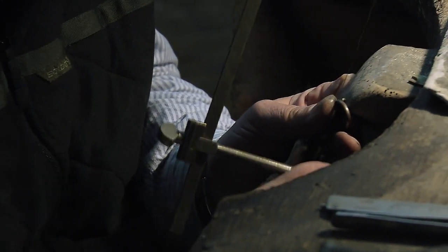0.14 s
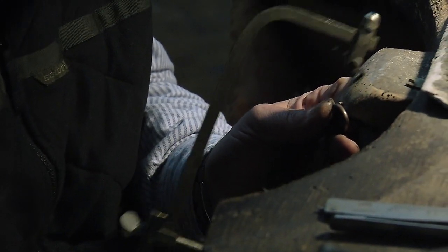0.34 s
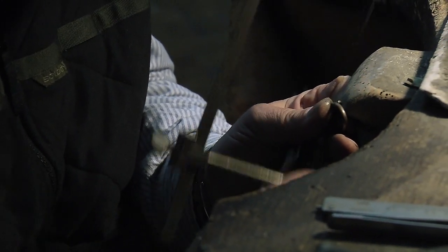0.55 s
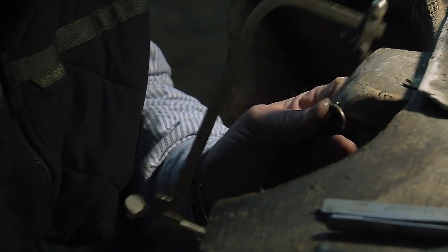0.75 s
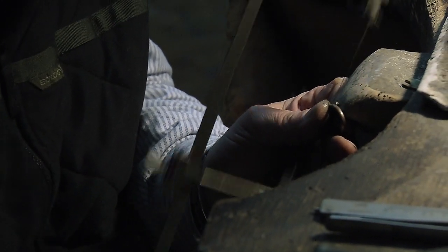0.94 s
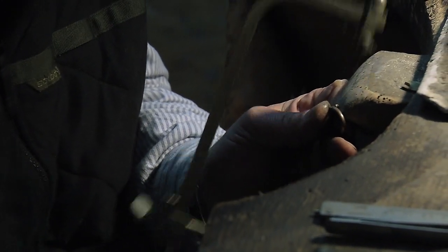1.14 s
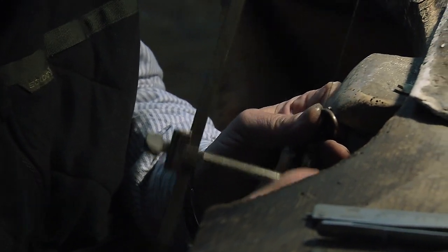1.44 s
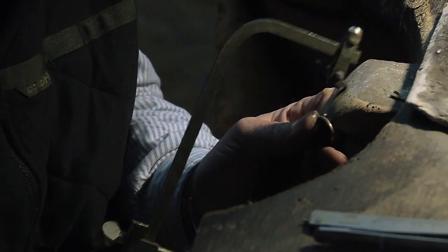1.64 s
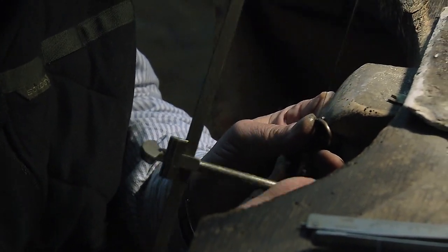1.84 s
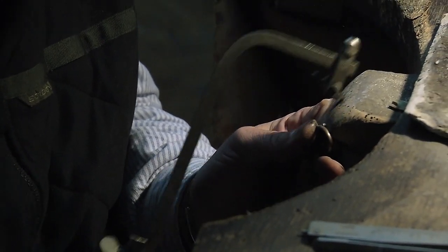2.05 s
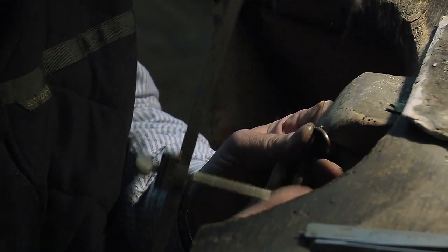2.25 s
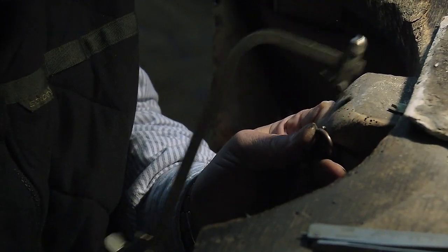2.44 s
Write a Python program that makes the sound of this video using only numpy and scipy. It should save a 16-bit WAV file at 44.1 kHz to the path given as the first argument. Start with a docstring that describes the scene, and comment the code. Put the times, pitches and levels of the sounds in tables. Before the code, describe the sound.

Fine-toothed hand saw rasping back and forth through a small metal ring, with brief squeaks, close up

```python
"""Small quiet workshop, close up: a piercing saw cuts a metal ring on a wooden bench pin, six double strokes.
Uneven tooth ticks and filing noise drive ring, frame, bench and blade modes; cuts are longer and deeper than returns.
Snagging teeth are decaying noise bursts; evenly biting teeth are short rough tones with an octave.
The binding blade squeaks in near-pure tones, the shortening blade chirps upward, single ring modes flare up.
A faint room answer and a steady shaped-noise floor lie behind."""
import sys
import numpy as np
from scipy import signal
from scipy.fft import rfft, irfft, next_fast_len
from scipy.io import wavfile
from scipy.ndimage import uniform_filter1d, map_coordinates

SR = 44100
rng = np.random.default_rng(int(sys.argv[2]) if len(sys.argv) > 2 else 0)


def inscribe(sig):
    """Save sig as 16-bit PCM at rate SR to the path in sys.argv[1].

    A 1-D sig is mono; a 2-D sig holds one channel per row.
    Samples are clipped to [-1, 1] before scaling.
    """
    pcm = np.round(np.clip(np.atleast_2d(sig).T, -1, 1) * 32767)
    wavfile.write(sys.argv[1], SR, pcm.astype(np.int16))


N = 114660

# modes of each body: (frequency [Hz], width [Hz], relative level on the return [dB], on the cut [dB])
RING_MODES = [(4185, 215, -16, -19.5), (4460, 154, -14, -14), (4774, 370, -16.5, -13.5),
              (5380, 373, -9, -9), (5964, 220, 4, 1.5), (6176, 271, 2, 1), (6600, 377, -4.5, -3.5),
              (7550, 340, -11.5, -6.5), (7884, 396, -12, -6)]
FRAME_MODES = [(663, 53, -8.5, -4), (823, 49, -15.5, -3.5), (878, 23, -13, -2.5), (1050, 119, -4.5, 4.5),
               (1074.5, 64.7, -12, 8.5), (1140, 78, -9.5, -2), (1372, 114, -6, -4.5), (1523, 70, -6, -3.5),
               (1928, 111, -9, -4.5), (2187, 74, -15.5, -10), (2491, 136, -11.5, -8.5),
               (2739, 280, -15.5, -14.5), (3590, 620, -38, -25)]
BENCH_MODES = [(108.4, 24, -10.5, -14.5), (197.3, 21.5, -17, -4), (246, 41.5, 9.9, 0.27),
               (292.3, 47, 2.5, -1.5), (439, 52, -18, -11), (523, 52.4, 0, -6)]
BLADE_MODES = [(9100, 240, 3, -15), (10340, 320, 1, 6.5), (10330, 340, -4, -1.5), (11810, 700, 3, 5.5),
               (13400, 900, -15, -4.5), (14100, 820, -14, -15), (15100, 280, -11, -6), (15500, 700, -9, -4)]
RETURN_COLUMN, CUT_COLUMN = 2, 3


def amp(db):
    """Amplitude factor of a level in dB."""
    return 10 ** (np.asarray(db) / 20)


def unit(x):
    """x scaled to rms 1."""
    return x / np.sqrt(np.mean(x ** 2) + 1e-20)


def along(points, hz):
    """(Hz, value) points interpolated on a log frequency axis."""
    point_hz, value = np.transpose(points)
    return np.interp(np.log(hz + 1), np.log(point_hz + 1), value)


def wobble(knots_per_s):
    """Smooth random curve through normally distributed knots."""
    knots = rng.standard_normal(int(N * knots_per_s / SR) + 4)
    return map_coordinates(knots, [np.arange(N) * knots_per_s / SR])


def filtered(x, response):
    """x times a complex response of frequency, zero-padded."""
    m = next_fast_len(N + SR // 2)
    return irfft(rfft(x, m) * response(np.fft.rfftfreq(m, 1 / SR)), m)[..., :N]


def body(modes, column):
    """Response of parallel resonances of alternating sign, rms gain 1 for white noise."""
    def response(f):
        h = 0
        for k, mode in enumerate(modes):
            mode_hz, width_hz = mode[:2]
            damping = 1j * f * width_hz
            h = h + (-1) ** k * amp(mode[column]) * damping / (mode_hz ** 2 - f * f + damping)
        return h / np.sqrt(np.mean(np.abs(h) ** 2))
    return response


def swell(u, peak, sharp):
    """Bump from 0 at u = 0 through 1 at the peak to 0 at u = 1."""
    u = np.clip(u, 0, 1)
    rise = (u / peak) ** peak
    fall = ((1 - u) / (1 - peak)) ** (1 - peak)
    return (rise * fall) ** (2 * sharp)


def teeth(teeth_per_s):
    """One tick per tooth, uneven in time and size, over filing noise."""
    jitter_teeth, scatter_db, grit_power_share = .35, 3, .68
    marks = np.flatnonzero(np.diff(np.floor(np.cumsum(teeth_per_s) / SR)))
    draw = rng.standard_normal((N, 2))[marks]
    late = jitter_teeth * draw[:, 0] * SR / teeth_per_s[marks]
    at = np.clip(np.round(marks + late), 0, N - 1).astype(int)
    size = amp(scatter_db * draw[:, 1])
    ticks = np.bincount(at, size, N) - size.mean() * teeth_per_s / SR  # mean removed
    ticks = ticks / np.std(ticks[teeth_per_s > 1])
    grit = rng.standard_normal(N)
    return np.sqrt(1 - grit_power_share) * ticks + np.sqrt(grit_power_share) * grit


def patchy(x, depth_db):
    """Random gain over time and frequency: resonances take turns as the contact point moves."""
    z = signal.stft(x, nperseg=512)[2]
    # patches of about 350 Hz by 30 ms, fading out in the bass
    field = uniform_filter1d(rng.standard_normal(z.shape), size=4, axis=0)
    field = uniform_filter1d(field, size=5, axis=1)
    field = np.clip(np.arange(len(z)) / 8, 0, 1)[:, None] * field
    gain = amp(depth_db * unit(field))
    return signal.istft(z * unit(gain), nperseg=512)[1][:N]


def strokes(rows, swells, column):
    """All strokes of one direction: the same teeth drive ring, frame, bench pin and blade."""
    # uneven bite: (knots per second [1/s], depth [dB])
    chatter = [(35, 2), (140, 1.5)]
    # depth factor of the bite for ring, frame, bench, blade: [1]
    chatter_share = [0.62, 0.53, 0.18, .6]
    slowing = .25  # share by which the tooth rate sags at the stroke ends
    patch_depth_db = 2.5
    t = np.arange(N) / SR

    teeth_per_s = np.full(N, 1e-3)
    for start_s, length_s, peak, top_rate, *_ in rows:
        inside = (t >= start_s) * (t < start_s + length_s)
        sag = slowing * (1 - swell((t - start_s) / length_s, peak, .99))
        teeth_per_s = teeth_per_s + inside * top_rate * (1 - sag)
    drive = teeth(teeth_per_s)

    shared_db = sum(db * wobble(rate) for rate, db in chatter)
    out = 0
    bodies = (RING_MODES, FRAME_MODES, BENCH_MODES, BLADE_MODES)
    for k, (modes, (sharp, later)) in enumerate(zip(bodies, swells)):
        force = 0
        for start_s, length_s, peak, _, peaked, *level_db in rows:
            u = (t - start_s) / length_s
            force = force + amp(level_db[k]) * swell(u, peak + later, sharp * peaked)
        own_db = sum(db * wobble(rate) for rate, db in chatter)
        bite = amp(chatter_share[k] * (shared_db + own_db))
        out = out + filtered(drive * force * unit(bite), body(modes, column))
    return patchy(out, patch_depth_db)


def catches():
    """Snagging teeth: noise bursts with instant onset and exponential decay ring the same bodies."""
    # teeth that catch hard: (time [s], ring drive peak [dB], frame and bench drive peak [dB])
    snags = [(0.1864, -41, -8.5), (0.2348, -24, -20.5), (0.2613, -15.5, -12), (0.407, -21, -43),
             (0.612, -34, -14.5), (0.7669, -15, -35), (0.9016, -26, -29), (1.2421, -32, -11),
             (1.3933, -24, -16.5), (1.6674, -32, -19), (1.8121, -23, -19), (1.948, -26, -18),
             (2.0754, -17.5, -8), (2.2755, -13, -18)]
    t60_s = .014
    blade_re_ring_db, bench_re_frame_db = -22.5, -5.5
    t, noise = np.arange(N) / SR, rng.standard_normal(N)
    high, low = 0, 0
    for start_s, high_db, low_db in snags:
        decay = amp(-60 * np.abs(t - start_s) / t60_s) * (t >= start_s)
        high = high + amp(high_db) * decay
        low = low + amp(low_db) * decay
    high, low = high * noise, low * noise
    ring = filtered(high, body(RING_MODES, CUT_COLUMN))
    blade = amp(blade_re_ring_db) * filtered(high, body(BLADE_MODES, CUT_COLUMN))
    frame = filtered(low, body(FRAME_MODES, CUT_COLUMN))
    bench = amp(bench_re_frame_db) * filtered(low, body(BENCH_MODES, CUT_COLUMN))
    return ring + blade + frame + bench


def glide_phase(u, from_hz, to_hz, waver):
    """Phase in radians of a linear, wavering pitch glide."""
    return 2 * np.pi * np.cumsum((from_hz + (to_hz - from_hz) * u) * waver) / SR


def runs():
    """Evenly biting teeth give a short rough pitch; its octave sounds where the frame resonates."""
    # (start [s], length [s], from [teeth/s], to [teeth/s], peak level [dB], relative octave drive [dB])
    notes = [(0.098, 0.037, 1210, 1340, -19.5, -1.5), (0.132, 0.04, 1260, 1320, -17.5, -8.5),
             (0.261, .022, 980, 690, -24, -16), (0.269, 0.033, 1130, 950, -17.5, -12),
             (.325, 0.019, 1100, 940, -42, 1), (0.527, .026, 980, 1110, -17, -10),
             (0.567, 0.056, 1530, 840, -17, -13), (0.719, 0.064, 1080, 1030, -30, -1),
             (0.984, 0.035, 1500, 1410, -20.5, -24), (1.134, .026, 970, 1050, -22, -8),
             (1.175, 0.022, 740, 980, -36, -2), (1.382, 0.028, 1450, 950, -29, -1),
             (1.542, 0.038, 1020, 1050, -21.5, -3), (1.796, 0.027, 886, 1220, -23, -13),
             (1.961, 0.034, 1050, 1085, -14.5, -15.5), (2.225, 0.023, 1190, 1210, -24.5, 1),
             (2.264, .024, 1400, 1250, -24, -12), (2.423, 0.028, 1090, 1070, -37, 1)]
    octave_gain_db = -7.5
    t, base, octave = np.arange(N) / SR, 0, 0
    waver, rough_db = 1 + .01197 * wobble(200), 3 * wobble(120)
    for start_s, length_s, from_hz, to_hz, db, octave_db in notes:
        u = np.clip((t - start_s) / length_s, 0, 1)
        phase = glide_phase(u, from_hz, to_hz, waver)
        shape = amp(db + rough_db) * swell(u, .5, .7)
        base = base + shape * np.sin(phase)
        octave = octave + amp(octave_db) * shape * np.cos(2 * phase)
    return base + amp(octave_gain_db) * filtered(octave, body(FRAME_MODES, RETURN_COLUMN))


def squeaks():
    """Stick-slip of the binding blade: nearly pure tones with faint, fluctuating overtones."""
    # one list per squeak: (time [s], pitch [Hz], rms level [dB])
    tracks = [
        [(0.0, 1197, -17), (0.028, 1190, -32), (0.044, 1184, -32), (0.06, 1181, -45)],
        [(1.265, 1160, -39), (1.273, 1160, -26), (1.289, 1161, -19), (1.315, 1159, -26), (1.345, 1155, -45)],
        [(2.1, 1164, -31), (2.108, 1164, -18), (2.124, 1166, -13), (2.138, 1164, -17), (2.15, 1160, -31),
         (2.162, 1164, -25), (2.172, 1177, -38), (2.19, 1177, -36)],
        [(2.525, 1166, -32), (2.545, 1165, -19), (2.587, 1159, -38), (2.595, 1160, -58)],
    ]
    # (harmonic number [1], relative level [dB])
    harmonics = [(2, -33), (3, -40), (7, -42)]
    t, out = np.arange(N) / SR, 0
    for rows in tracks:
        time_s, hz, db = np.transpose(rows)
        phase = 2 * np.pi * np.cumsum(np.interp(t, time_s, hz)) / SR
        tone = np.sin(phase)
        for k, rel_db in harmonics:
            tone = tone + amp(rel_db) * wobble(150) * np.sin(k * phase)
        gate = uniform_filter1d(1. * (t >= time_s[0]) * (t < time_s[-1]), size=150)  # 3.4 ms edges
        out = out + np.sqrt(2) * gate * amp(np.interp(t, time_s, db)) * tone
    return out


def rough_glides(rows):
    """Short sine glides with wavering pitch and rough level, each under one swell."""
    t, out = np.arange(N) / SR, 0
    waver, rough_db = 1 + .015 * wobble(400), 3 * wobble(250)
    for start_s, length_s, from_hz, to_hz, db in rows:
        u = np.clip((t - start_s) / length_s, 0, 1)
        phase = glide_phase(u, from_hz, to_hz, waver)
        out = out + amp(db + rough_db) * swell(u, .5, .5) * np.sin(phase)
    return out


def chirps():
    """The shortening blade: its pitch glides upward."""
    # (start [s], length [s], from [Hz], to [Hz], peak level [dB])
    glides = [(1.45, .03, 9300, 13800, -53), (2.272, .02, 10500, 14500, -54),
              (2.29, .024, 9300, 13000, -48), (2.422, .052, 4900, 8300, -26)]
    return rough_glides(glides)


def flares():
    """Single modes of the ring that flare up for a moment at a level mean pitch."""
    # (start [s], length [s], pitch [Hz], peak level [dB])
    ring_flares = [(.262, .025, 4170, -30), (.535, .02, 4400, -30), (.588, .02, 3450, -33),
                   (.76, .018, 4300, -31), (1.538, .02, 4750, -34), (1.565, .018, 4150, -35),
                   (1.958, .028, 4140, -28)]
    return rough_glides([(start_s, length_s, hz, hz, db) for start_s, length_s, hz, db in ring_flares])


def room(x):
    """Workshop answer: a noise tail in which each frequency dies at its own speed."""
    # (frequency [Hz], T60 [s])
    decay = [(200, 0.14), (2000, 0.34), (6000, 0.21), (12000, 0.15)]
    hz, t, z = signal.stft(rng.standard_normal(SR // 2), SR, nperseg=256)
    tail = signal.istft(z * amp(-60 * t / along(decay, hz)[:, None]), SR, nperseg=256)[1]
    delayed = np.pad(x, (300, 0))  # 6.8 ms
    return signal.fftconvolve(delayed, tail / np.linalg.norm(tail))[:N]


def background():
    """Steady noise floor of fixed spectrum."""
    # (frequency [Hz], relative level [dB])
    spectrum = [(18, -36), (30, -15.5), (286, -0.5), (627, -9.5), (1240, -1), (1530, -7.5), (3100, -21),
                (3440, -27.5), (3830, -21.5), (4840, -19.5), (7370, -15.5), (9570, -29.5), (15800, -43)]
    level_db = -37
    noise = filtered(rng.standard_normal(N), lambda hz: amp(along(spectrum, hz)))
    return amp(level_db) * unit(noise)


def scene():
    """Strokes, catches and tones with their room answer, plus dry squeaks and the floor."""
    # strokes: (start [s], length [s], moment of full force [share of length], top tooth rate [teeth/s],
    #           peakedness [1], ring drive [dB], frame drive [dB], bench drive [dB], blade drive [dB])
    return_rows = [(.07, .16, 0.33, 1230, 0.82, -23, -21.5, -29.5, -45),
                   (.485, 0.16, 0.41, 1160, 0.73, -20.5, -21, -27, -43.5),
                   (.9, 0.16, 0.57, 1290, 0.75, -26, -25.5, -29, -43),
                   (1.35, .15, .35, 1250, 0.69, -24, -25.5, -38, -46),
                   (1.76, .165, .4, 1300, 1.17, -20, -21.5, -27.5, -43),
                   (2.18, 0.17, 0.32, 1260, 0.88, -21.5, -24, -29.5, -48)]
    cut_rows = [(.232, 0.21, 0.31, 1050, 0.71, -24.5, -23, -24, -47),
                (.67, 0.2, 0.32, 1097, 0.73, -25.5, -26, -25.5, -46.5),
                (1.085, .21, 0.34, 993.3, 0.92, -26, -24, -25.5, -44),
                (1.505, 0.25, 0.29, 1032, 2.08, -24, -22.5, -23.5, -44),
                (1.93, .2, .3, 1079, 0.94, -22, -22.5, -24.5, -47),
                (2.345, 0.23, 0.31, 1046, 1.26, -24, -22, -25.5, -45)]
    # swell per body, rows ring, frame, bench, blade: (sharpness [1], delay of full force [share of length])
    return_swell = [(1.96, 0.0062), (1.34, 0.089), (0.49, .1), (3.2, 0.086)]
    cut_swell = [(1.66, -0.032), (0.95, 0.0023), (0.61, 0.11), (1.64, 0.058)]
    room_db = -10.5
    returning = strokes(return_rows, return_swell, RETURN_COLUMN)
    cutting = strokes(cut_rows, cut_swell, CUT_COLUMN)
    saw = returning + cutting + catches()
    tones = runs() + chirps() + flares()
    answer = amp(room_db) * room(saw + .5 * tones)
    return (saw + tones + answer + squeaks() + background())[None]


def record(dry):
    """Third-order bass cut at 75 Hz, and nothing above the band limit."""
    top_hz = 15850
    return filtered(dry, lambda hz: (1j * hz / (75 + 1j * hz)) ** 3 * (hz < top_hz))


dry = scene()
out = record(dry)
inscribe(out)
```